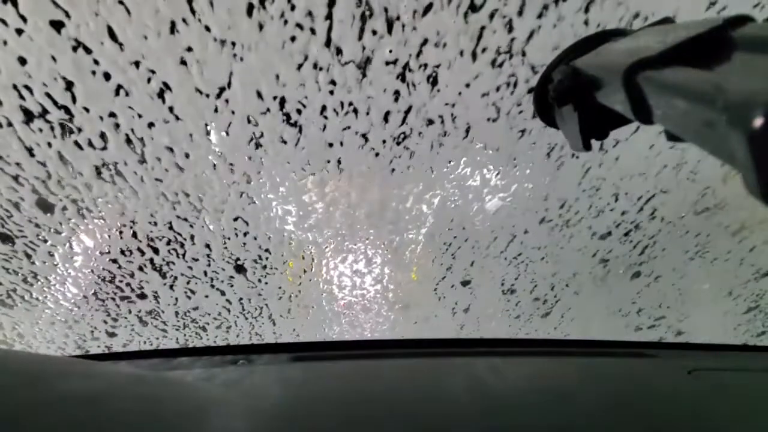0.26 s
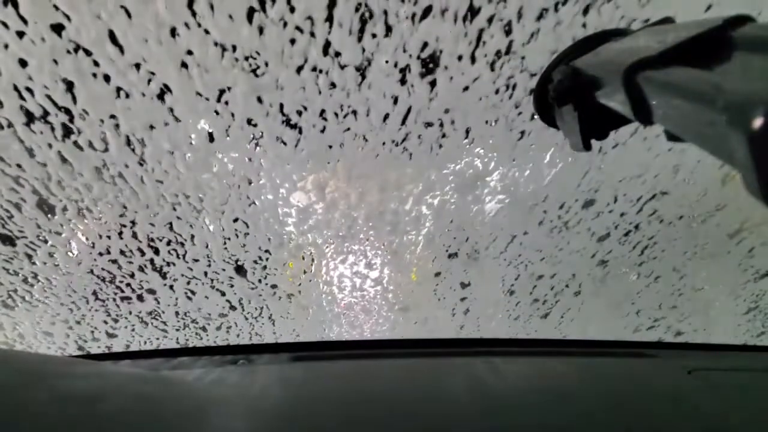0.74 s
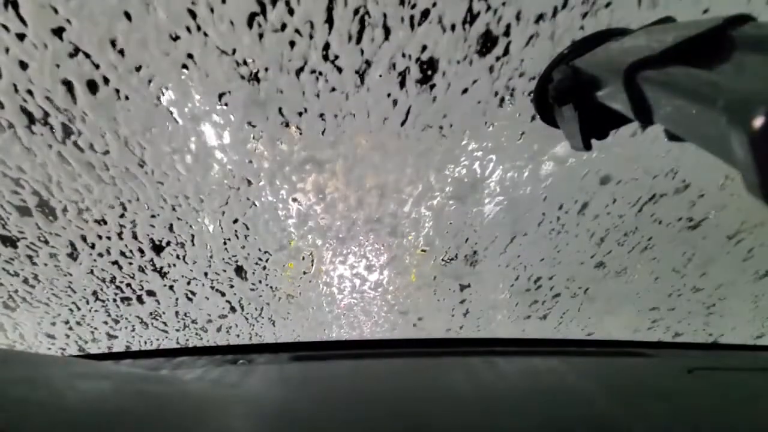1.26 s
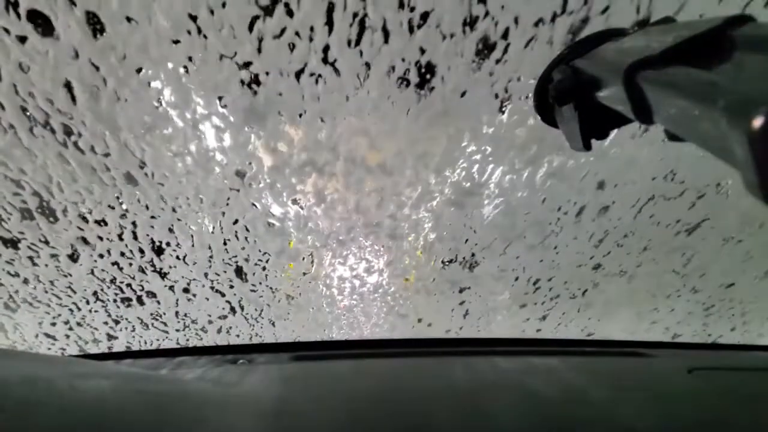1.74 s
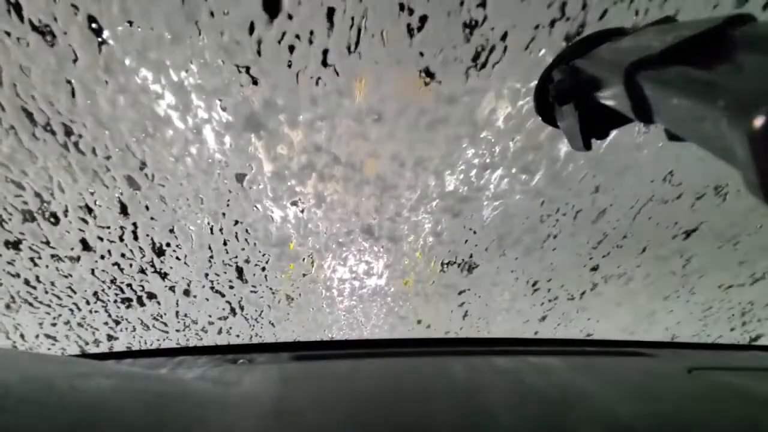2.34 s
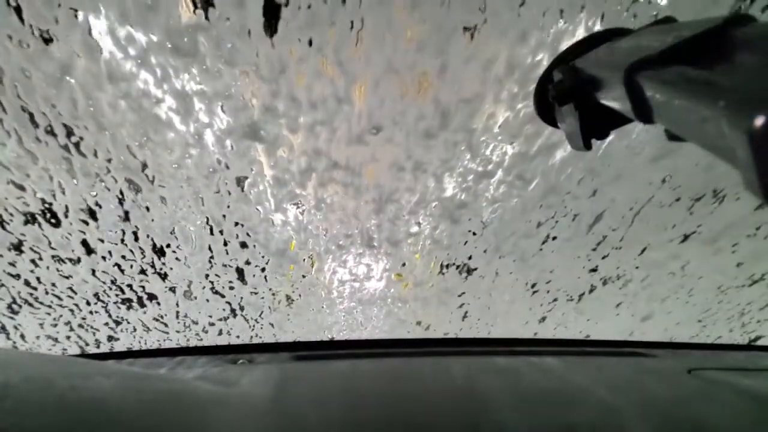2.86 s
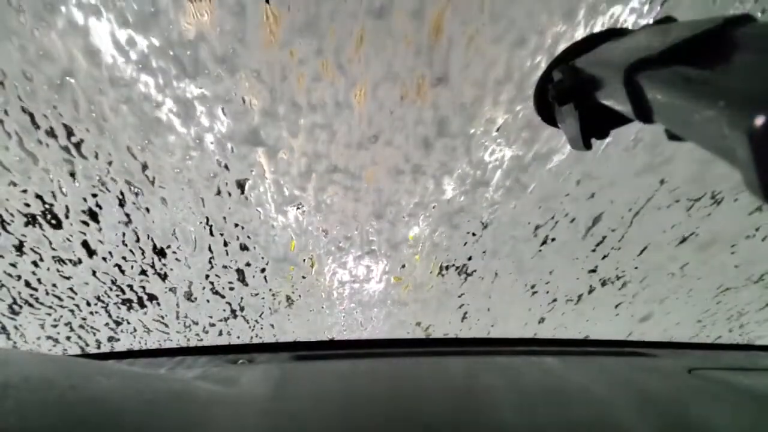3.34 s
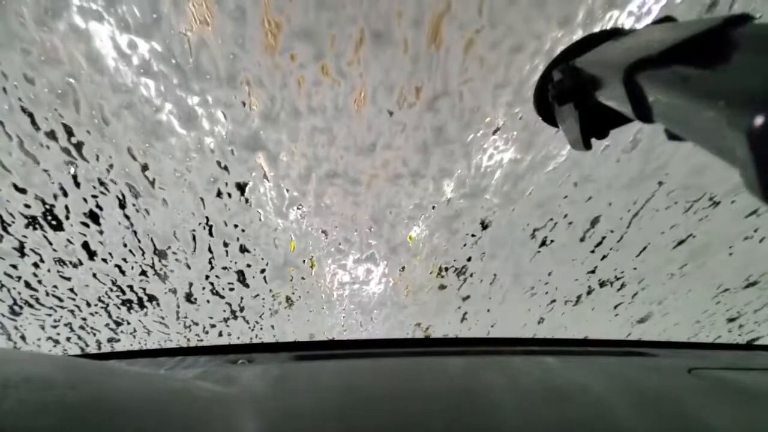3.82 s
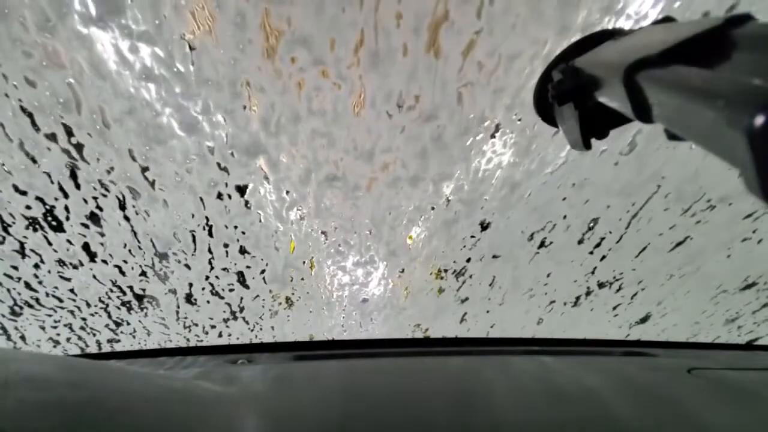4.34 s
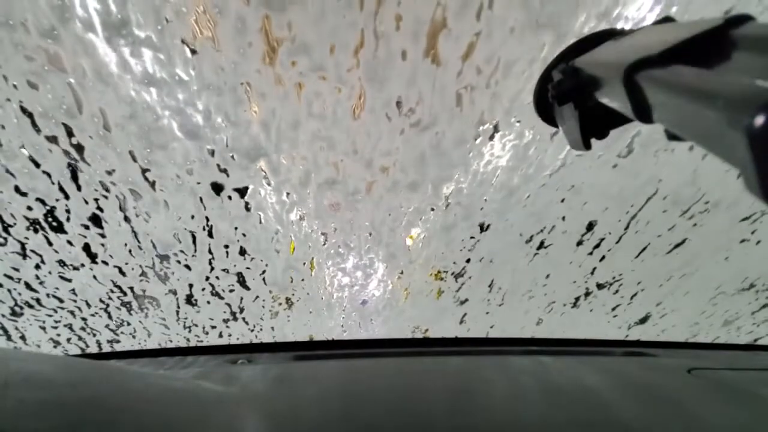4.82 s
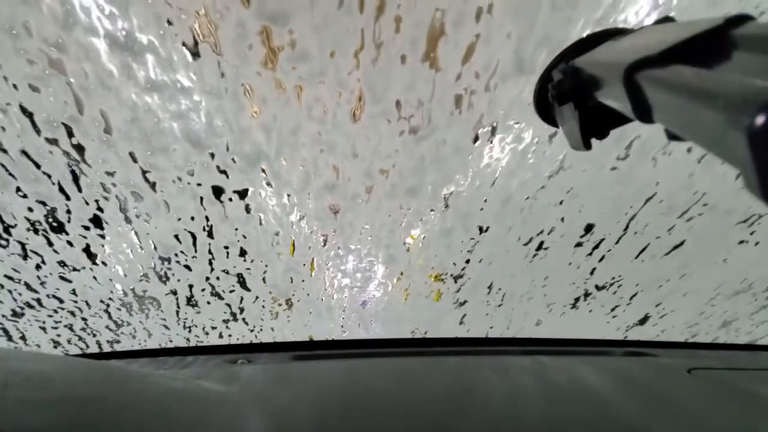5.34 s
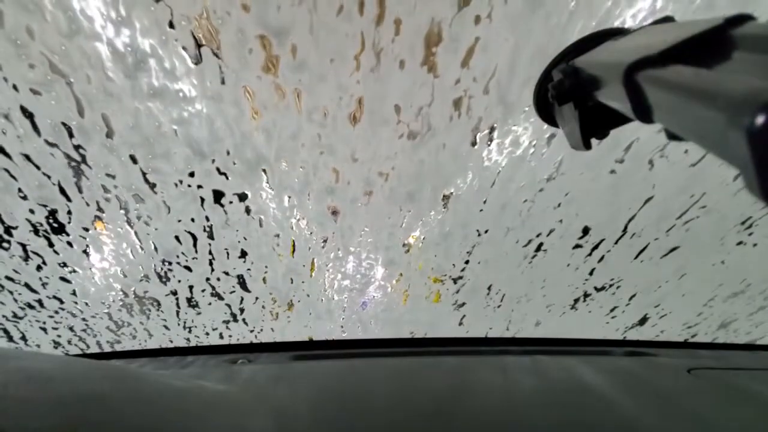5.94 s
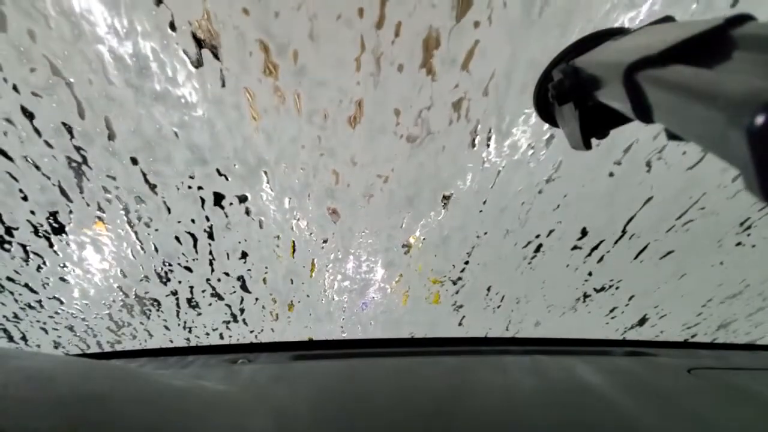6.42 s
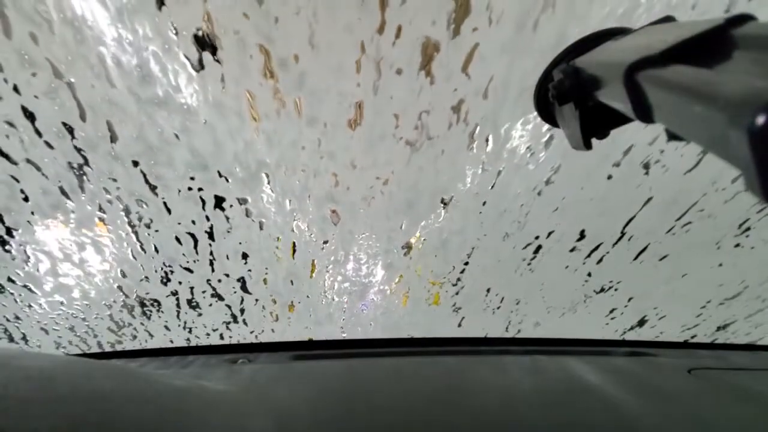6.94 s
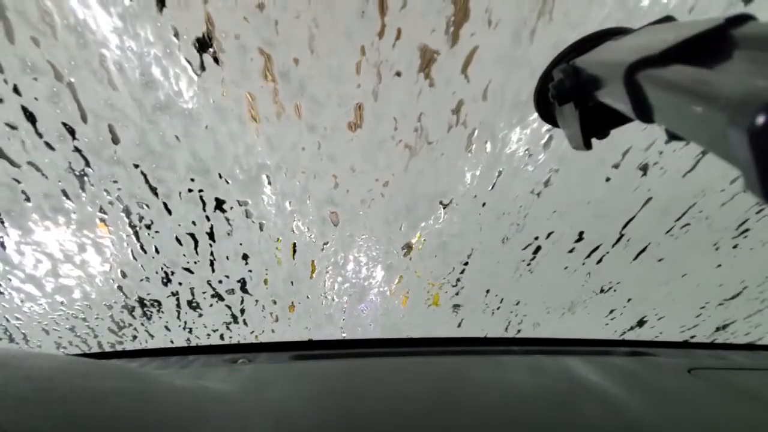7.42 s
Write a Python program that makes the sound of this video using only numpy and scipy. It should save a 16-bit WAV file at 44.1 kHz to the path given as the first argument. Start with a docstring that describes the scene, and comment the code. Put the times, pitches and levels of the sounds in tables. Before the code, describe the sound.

Steady wash noise fills a small boxy car cabin, heard in stereo from within. Low boom and uneven pounding of water on metal mix with hollow panel tones and faint hiss at the seals. Sharp, close, plastic-like crinkling clusters early, then fades. The pounding builds overhead, cuts off suddenly late on, and a low machine rumble rises with a few last small crackles.

```python
"""Water jets and cloth strips drum on the roof, doors and glass of a car in a tunnel wash, heard from inside.
Noise shaped by resonances is the drumming and cabin boom; decaying sines are brief swells of the drumming.
Spray hisses through the seals as broad noise, over a rumble of machinery that grows louder toward the end.
Close to the two microphones something crinkles in short bursts, mostly in the first three seconds.
The jets leave the roof abruptly at six seconds."""
import sys
import numpy as np
from scipy import signal
from scipy.fft import rfft, irfft, next_fast_len
from scipy.io import wavfile
from scipy.ndimage import uniform_filter1d, map_coordinates

SR = 44100
rng = np.random.default_rng(int(sys.argv[2]) if len(sys.argv) > 2 else 0)


def dump_mix(stems):
    """Bounce the given channels to the path in sys.argv[1] as a 16-bit WAV at rate SR."""
    frames = np.atleast_2d(stems).T  # one column per channel
    limited = np.clip(frames, -1, 1)  # hard clip at full scale
    pcm = np.round(limited * 32767).astype(np.int16)
    wavfile.write(sys.argv[1], SR, pcm)


N = 338247

# Force of the strips on the flanks. Each row: time in seconds, level on roof edges in dB, on wings in dB.
FLANK_LEVELS = [(0.0, -32, -27.5), (0.04, -33, -28.5), (0.15, -35.5, -29.5), (2.69, -27, -29),
                (2.84, -33.5, -31), (3.65, -29, -27.5), (3.76, -28, -31.5), (5.17, -23, -29),
                (5.3, -24, -37.5), (5.62, -24.5, -26), (5.66, -23.5, -32), (5.7, -30, -28),
                (6.0, -31.5, -27.5), (6.04, -34, -40), (6.77, -28, -34), (6.81, -33.5, -40.5),
                (7.58, -27, -33), (7.67, -34, -40)]
CREST_DB = 6  # allowance for the peak of a noise burst over its rms
CRINKLE_T = np.arange(SR // 6) / SR  # seconds
CRINKLE_RISE = 1 - np.exp(-CRINKLE_T / 0.003)


def amp(db):
    """Decibel law: twenty dB is a factor of ten in amplitude."""
    return 10 ** (np.asarray(db) / 20)


def unit(x):
    """Normalisation of the root mean square to 1."""
    return x / np.sqrt(np.mean(x ** 2) + 1e-20)


def along(points, hz):
    """Interpolation of (Hz, value) points on a logarithmic frequency axis."""
    f, v = np.transpose(points)
    return np.interp(np.log(hz + 1), np.log(f + 1), v)


def spectrum(points):
    """Spectral envelope: gain as a function of frequency from (Hz, dB) points."""
    return lambda hz: amp(along(points, hz))


def curves(rows):
    """Linear interpolation in time: one curve for each column after the seconds."""
    s, *columns = np.transpose(rows)
    return [np.interp(np.arange(N) / SR, s, column) for column in columns]


def wobble(rate):
    """Slow random modulation: a smooth curve through Gaussian knots, rate of them a second."""
    knots = rng.standard_normal(int(N * rate / SR) + 4)
    return map_coordinates(knots, [np.arange(N) * rate / SR])


def filtered(x, response):
    """Linear filtering: the spectrum times a response of frequency."""
    m = next_fast_len(N + SR // 2)  # padded against wrap-around
    return irfft(rfft(x, m) * response(np.fft.rfftfreq(m, 1 / SR)), m)[..., :N]


def modes(table, steep):
    """Incoherent resonance: powers of (Hz, width, dB) modes add; steep sharpens skirts and narrows width."""
    def gain(f):
        power = 0
        for centre, width, db in table:
            damping = (f * width) ** 2
            bell = damping / ((centre * centre - f * f) ** 2 + damping)
            power = power + amp(2 * db) * bell ** steep
        return np.sqrt(power)
    return gain


def rush(gain, patchy_db, size=3):
    """Filtered stereo noise of rms 1, its level patchy in time and frequency (size x 43 Hz wide)."""
    # Width of the image. Each row: frequency in Hz, side over mid in dB.
    side_over_mid = [(40, -16.5), (62, -26.5), (95, -7), (126, -26.5), (170, -12.5), (320, -11.5),
                     (430, -3), (540, -5), (850, 1), (1150, -0.5), (1400, 2), (1800, -1), (5600, 1.1),
                     (7500, -9.5), (10500, -9.5), (14500, -4.5)]
    z = signal.stft(rng.standard_normal((2, N)), nperseg=1024)[2]
    field = uniform_filter1d(rng.standard_normal(z.shape[1:]), size=size, axis=0)
    field = uniform_filter1d(field, size=30 // size + 1, axis=1)
    pair = signal.istft(z * amp(patchy_db * unit(field)), nperseg=1024)[1][:, :N]

    def mid_side_gain(hz):
        turn = np.arctan(amp(along(side_over_mid, hz)))
        return gain(hz) * [np.cos(turn), np.sin(turn)]
    mid, side = filtered(pair, mid_side_gain)
    return unit(np.array([mid + side, mid - side]))


def work():
    """Forced vibration: curves of how hard the water works on each part of the car."""
    # Each row: time in seconds, then dB of roof, doors, windscreen, jets outside and side windows.
    force_levels = [(0, -32, -25, -29, -30, -27.5), (.2, -31.5, -27, -33, -38.5, -30),
                    (.35, -31.5, -27.5, -34, -35.5, -32), (.52, -26.5, -27.5, -37, -42.5, -39),
                    (.64, -45, -23.5, -34, -35.5, -34.5), (.8, -31.5, -27.5, -34.5, -41, -36.5),
                    (1.6, -29.5, -24, -32, -39, -36), (2.05, -28.5, -22.5, -30.5, -39.5, -36.5),
                    (2.2, -27.5, -28.5, -32.5, -38.5, -36.5), (3.25, -23, -24, -34, -41, -38),
                    (3.5, -20, -28.5, -29, -37.5, -34.5), (3.72, -22.5, -24, -27, -36, -35.5),
                    (3.9, -22, -25, -29.5, -42.5, -38.5), (4.6, -20.5, -22, -33.5, -39.5, -38.5),
                    (5.25, -17.5, -25.5, -31.5, -39, -37.5), (5.55, -24, -20, -33, -40, -39.5),
                    (5.9, -18.5, -26, -30.5, -39.5, -38), (6.07, -41, -37, -39, -41, -40.5),
                    (6.6, -35.5, -31, -36.5, -38, -42.5), (7.15, -41.5, -31, -40, -39.5, -39),
                    (7.45, -32, -34.5, -34.5, -36, -42), (7.67, -29, -33, -33.5, -35.5, -35)]
    return np.array(curves(force_levels))


def flutter(share=1):
    """Random loading: strips land unevenly, each part in its own rhythm and by its share of 1.5 dB."""
    return share * 1.5 * wobble(9)


def cabin_air():
    """Cavity resonance: water on the roof pumps the lowest modes of the cabin air."""
    # Each row: frequency in Hz, width in Hz before sharpening, relative level in dB.
    low_modes = [(40, 8.8, 0)]
    high_modes = [(52.5, 11, 6.5), (82, 35, -2.5)]
    # Each row: time in seconds, lower boom in dB, upper boom in dB.
    boom_levels = [(0.0, -39, -36), (0.13, -29, -38.5), (0.49, -47, -35.5), (0.66, -33, -38.5),
                   (1.77, -27.5, -31), (2.48, -34, -35), (2.54, -26, -34), (2.69, -40, -37.5),
                   (2.76, -28, -53), (2.8, -25, -28.5), (2.93, -43, -35), (3.1, -25.5, -38),
                   (3.99, -38, -36), (6.45, -43, -35.5), (6.73, -37.5, -37), (6.84, -49, -34),
                   (7.13, -33, -49), (7.22, -33, -32), (7.58, -32, -29.5), (7.67, -52, -30)]
    low_db, high_db = curves(boom_levels)
    boom = amp(low_db + flutter()) * rush(modes(low_modes, steep=1.28), patchy_db=4.5)
    return boom + amp(high_db + flutter()) * rush(modes(high_modes, steep=1.186), patchy_db=0.7)


def roof():
    """Plate resonance: water rings the lowest modes of the roof and its edges."""
    # Each row: frequency in Hz, width in Hz before sharpening, relative level in dB.
    centre_modes = [(109.5, 16, -10.5), (124.2, 17, -1.5), (143, 22, -4.5), (165, 24, -9.5)]
    edge_modes = [(182.7, 29, -1.5), (213.6, 106, -1.5), (272, 85, -3.5)]
    centre_db = work()[0] + flutter(0.5) + 0.44 * wobble(22)
    edge_db = curves(FLANK_LEVELS)[0] + flutter(0.32)
    centre = amp(centre_db) * rush(modes(centre_modes, steep=1.56), patchy_db=1.0)
    return centre + amp(edge_db) * rush(modes(edge_modes, steep=2.47), patchy_db=0.36)


def doors_and_wings():
    """Panel resonance: doors and wings ring under the strips."""
    # Each row: frequency in Hz, width in Hz before sharpening, relative level in dB.
    door_modes = [(312.3, 99, -5.5), (380, 77, -1), (429, 94, -2)]
    wing_modes = [(499, 54, -3.5), (547.4, 41, -3), (587, 59, -4.5)]
    door_db = work()[1] + flutter(0.14)
    wing_db = curves(FLANK_LEVELS)[1] + flutter(0.4)
    doors = amp(door_db) * rush(modes(door_modes, steep=2.6), patchy_db=2.5)
    return doors + amp(wing_db) * rush(modes(wing_modes, steep=1.7), patchy_db=0.9)


def glass():
    """Pane resonance: windscreen, side windows and quarter windows ring above the roof and doors."""
    # Each row: frequency in Hz, width in Hz before sharpening, relative level in dB.
    windscreen_modes = [(643, 54, -2), (713, 92, -2.5), (790, 110, -5)]
    window_modes = [(1017, 157, 0.13), (1173, 110, -1.6)]
    quarter_modes = [(898, 173, 0)]
    # Mean level in dB, then dB per dB of roof, doors, windscreen, jets and side windows.
    quarter_rule = (-38, 0, 0.25, .5, -0.5, 0.3)
    parts = work()
    swing = parts - parts.mean(axis=1, keepdims=True)
    quarter_db = quarter_rule[0] + np.dot(quarter_rule[1:], swing) + flutter(0.33)
    windscreen = amp(parts[2] + flutter(0.33)) * rush(modes(windscreen_modes, steep=2.04), patchy_db=1.2)
    windows = amp(parts[4] + flutter(0.21)) * rush(modes(window_modes, steep=1.5), patchy_db=2.5)
    return windscreen + windows + amp(quarter_db) * rush(modes(quarter_modes, steep=1.77), patchy_db=3.0)


def jets():
    """Turbulent noise: jets outside and their nozzles hiss in bands above 1 kHz."""
    # Each row: frequency in Hz, width in Hz before sharpening, relative level in dB.
    jet_bands = [(1352, 365, 1)]
    nozzle_bands = [(1650, 190, 2), (1883, 415, -2)]
    # Each row: time in seconds, level in dB.
    nozzle_levels = [(0, -35.5), (.4, -38), (.55, -43), (.64, -39), (.72, -43), (1.1, -44), (2.2, -44.5),
                     (3.1, -44), (3.65, -38.5), (4.1, -42), (5.6, -43), (5.85, -41), (6.2, -41), (6.8, -42),
                     (7.3, -40.5), (7.67, -37.5)]
    nozzle_db = curves(nozzle_levels)[0] + flutter(0.44)
    nozzles = amp(nozzle_db) * rush(modes(nozzle_bands, steep=2.0), patchy_db=3.0)
    return nozzles + amp(work()[3] + flutter(0.15)) * rush(modes(jet_bands, steep=1.97), patchy_db=2.5)


def seal_hiss():
    """Broadband flow noise: spray and finer mist through the seals share one pulsing flow."""
    # Each row: frequency in Hz, relative level in dB per Hz.
    spray_colour = [(1500, -40), (2200, 1), (2700, -5), (3500, -4.5), (4800, -15), (6800, -20.5),
                    (8000, -32.5), (9500, -57.5)]
    mist_colour = [(6500, -10), (8200, -7.5), (10500, -1.5), (13500, 4.5), (15700, -2)]
    # Each row: time in seconds, spray level in dB, mist level in dB.
    hiss_levels = [(0, -45, -63.5), (.3, -43.5, -62.5), (.7, -47.5, -65.5), (2.6, -44.5, -66.5),
                   (3.15, -45.5, -71), (3.6, -46, -66.5), (4.4, -47, -66.5), (5.35, -47.5, -70.5),
                   (5.9, -47, -70), (6.2, -46, -69), (6.8, -44.5, -65), (7.25, -45.5, -69),
                   (7.67, -42.5, -69.5)]
    spray_db, mist_db = curves(hiss_levels)
    surge = wobble(3.0)  # felt most in the mist
    spray = amp(spray_db + 0.33 * surge) * rush(spectrum(spray_colour), patchy_db=2.5, size=10)
    return spray + amp(mist_db + 0.6 * surge) * rush(spectrum(mist_colour), patchy_db=2.5, size=10)


def singing():
    """Narrow-band noise: lightly damped panel modes sing out while a jet stays on them."""
    # Each row: frequency in Hz, width in Hz before sharpening.
    narrow_modes = [(372, 27), (540, 22), (708, 26), (755, 26), (1080, 100)]
    # Each row: time in seconds, then the level in dB of each narrow mode before a 3 dB cut.
    mode_levels = [(0.0, -34, -42, -38, -33.5, -39.5), (0.04, -36, -37, -47, -40, -41),
                   (0.36, -45, -31, -50, -25, -44), (0.94, -26.5, -41, -46, -42, -49),
                   (1.05, -23, -32, -48, -49, -42), (1.11, -30, -25, -41, -40, -31),
                   (1.18, -30, -30, -36, -38, -38), (2.22, -31, -42, -46, -55, -50),
                   (2.29, -29, -20, -44, -37, -39), (2.71, -26.5, -40, -50, -48, -44),
                   (3.25, -26.5, -41, -39, -45, -33), (3.69, -36, -33, -30, -38, -31),
                   (3.84, -25, -48, -48, -43, -32.5), (4.04, -27, -41, -39, -44, -42.5),
                   (4.74, -34.5, -38.5, -44, -48.5, -42), (5.0, -27, -31.5, -36.5, -40, -45),
                   (5.55, -33.5, -40, -44, -45, -41), (5.88, -29, -41, -35, -45, -39),
                   (6.04, -45, -35, -44, -43, -42), (6.22, -53, -40, -48, -52, -50),
                   (7.13, -40, -43, -45, -36, -62), (7.22, -49, -44, -57, -50, -44),
                   (7.37, -38, -51, -33, -33, -50), (7.52, -31, -43, -48, -41, -40),
                   (7.61, -27.5, -51, -38, -36, -43), (7.67, -29, -45, -48, -50, -37)]
    out = 0
    for (hz, width), level_db in zip(narrow_modes, curves(mode_levels)):
        out = out + amp(level_db - 3) * rush(modes([(hz, width, 0)], steep=1.42), patchy_db=1.0)
    return out


def rumble():
    """Broadband noise: a broad rumble of machinery down the tunnel, growing louder toward the end."""
    # Each row: frequency in Hz, relative level in dB per Hz.
    rumble_colour = [(41, -32), (70, -2.5), (91, -9), (140, 1.5), (208, -5), (333, -13), (426, -8),
                     (900, -28.5), (1170, -59.5), (1980, -120)]
    # Each row: time in seconds, level in dB.
    rumble_levels = [(0, -37), (3, -37), (5.9, -32), (6.1, -31.5), (6.6, -31.5), (7.1, -27.5), (7.3, -26),
                     (7.5, -22.5), (7.67, -25.5)]
    return amp(curves(rumble_levels)[0]) * rush(spectrum(rumble_colour), patchy_db=1.4)


def swells():
    """Resonant swell: each brief swell of the drumming rises at one pitch and dies away."""
    # Each row: start in seconds, frequency in Hz, level in dB before rise and decay.
    swell_events = [(.012, 1065, -23), (.05, 1160, -20.5), (0.158, 1050, -23), (0.501, 547, -19.5),
                    (0.981, 382.6, -21), (1.09, 544.3, -15), (1.181, 380, -13), (1.471, 40, -19),
                    (1.849, 533, -13.5), (2.17, 131.3, -8.5), (2.31, 544, -16.5), (2.67, 127, -13),
                    (2.355, 141, -16), (2.976, 133, -15), (3.355, 139.6, -13), (3.131, 380, -8),
                    (3.684, 126.5, -10), (3.57, 709, -22), (3.67, 708, -19), (3.725, 697, -17),
                    (3.946, 148.7, -9), (4.02, 395, -23), (4.038, 127.3, -9), (4.17, 125.3, -5),
                    (4.244, 193, -12.5), (4.42, 125.5, -18), (4.329, 131, -6.5), (4.537, 182.4, -14),
                    (4.632, 139.6, -10.5), (4.748, 151.5, -15), (4.845, 127, -9), (4.951, 136.2, -6.5),
                    (5.187, 177, -6.5), (5.212, 134, -6.5), (5.287, 126.3, -8.5), (5.298, 202, -13.5),
                    (5.41, 132, -10.5), (5.62, 130, -9), (5.641, 196, -14.5), (5.62, 396, -11),
                    (5.797, 131.6, -8), (7.217, 148, -17.5), (7.385, 52.3, -16)]
    rise_s, t60_s, t60_hz, damping = 0.0095, 0.34, 130, 0.32  # t60 holds at t60_hz
    t, out = np.arange(SR // 2) / SR, np.zeros(N + SR)
    for s, hz, db in swell_events:
        decay_db = 60 * t / t60_s * (hz / t60_hz) ** damping  # higher pitches die sooner
        ring = np.sin(2 * np.pi * (hz * t + rng.random())) * amp(db - decay_db)
        out[round(s * SR):][:len(t)] += ring * (1 - np.exp(-t / rise_s))
    return out[:N]


def sheet_ring():
    """Modal superposition: damped sines of the crinkling sheet, in another phase at each ear."""
    # Each row: frequency in Hz, mean level in dB, 60 dB decay time in seconds.
    sheet_modes = [(1850, -8, .018), (2350, -7.5, 0.012), (2900, -2.5, 0.023), (3412, -1, .022),
                   (3800, -2, 0.019), (4700, -5.5, 0.013)]
    ring = 0
    for hz, db, t60 in sheet_modes:
        phase = rng.random((2, 1))
        decay = amp(db + rng.normal(0, 3.2) - 60 * CRINKLE_T / t60)
        ring = ring + decay * np.sin(2 * np.pi * (hz * CRINKLE_T + phase))
    return ring * CRINKLE_RISE


def snaps():
    """Impulsive excitation: envelopes of body, sheen and top, the rings, and the bustle after each snap."""
    # Each row: start in seconds, nominal peak in dB, sheen over body in dB,
    # top in dB relative to the nominal peak, ring frequency in Hz.
    snap_events = [(0.188, -29, -18, -39, 2370), (0.223, -32, -20, -41, 2670),
                   (0.6838, -38.5, -14, -21, 2750), (0.703, -31.5, -1, -16, 3640),
                   (0.7317, -36, -18, -34, 3480), (0.8964, -12.5, -8.5, -18, 4380),
                   (0.93, -37, -8, -24, 3300), (0.996, -31, -15, -30, 3630),
                   (1.0555, -27.5, -12, -27, 3560), (1.084, -28.5, -6, -17, 3000),
                   (1.106, -35, -11, -22, 3000), (1.142, -31, -6, -21, 2250), (1.156, -32, -13, -23, 2900),
                   (1.222, -11, -13, -29.5, 3270), (1.236, -27.5, -12, -28, 3020),
                   (1.2444, -28.5, -2, -20.5, 3100), (1.261, -27, -10, -37, 3080),
                   (1.2974, -27.5, -18, -27, 3500), (1.448, -36, -6, -23.5, 3500),
                   (1.363, -23.5, -20, -31.5, 3540), (1.3885, -27, -8, -30, 3020),
                   (1.476, -21, -13, -34.5, 3470), (1.494, -38, -13, -28, 2600),
                   (1.589, -36.5, -15, -21, 3000), (1.5449, -41, -2, -20.5, 2340),
                   (1.633, -24, -9, -22.5, 2750), (1.6466, -25.5, -2.5, -16, 3220),
                   (1.656, -16.5, -11.5, -20, 3470), (1.668, -37, -7, -19, 2360),
                   (1.729, -24.5, -8, -26.5, 3750), (1.7466, -15.5, -13.5, -25.5, 3320),
                   (1.765, -29, -7, -25.5, 3300), (1.799, -35, -18, -28, 3000),
                   (1.835, -26.5, -19, -34.5, 3200), (1.778, -29.5, -8, -21, 3630),
                   (1.845, -25, -20, -35, 3760), (1.863, -44, -20, -30, 3300), (1.917, -26, -16, -31, 3350),
                   (1.946, -40.5, -18, -21.5, 3000), (1.9085, -17, -14, -32.5, 3330),
                   (1.927, -17.5, -11, -30.5, 3550), (2.005, -31.5, -4, -17.5, 2940),
                   (2.024, -29, -13, -32, 3020), (2.041, -31.5, -10, -30, 2070),
                   (2.0657, -24.5, -2, -15, 3710), (2.086, -22.5, -4, -21, 3800),
                   (2.123, -45.5, -20, -24.5, 3020), (2.158, -42, -11, -27.5, 2510),
                   (2.1809, -37, 2, -22.5, 2520), (2.202, -21, -13, -28, 3060),
                   (2.213, -30.5, -7, -24, 3180), (2.244, -29.5, -2, -27, 2710),
                   (2.305, -22, -9, -26, 3700), (2.326, -20, -20, -34, 3120),
                   (2.36, -28, -14.5, -21.5, 3000), (2.378, -21, -8, -29.5, 2680),
                   (2.398, -27, -13, -26, 3070), (2.4483, -32, -26, -32, 3370),
                   (2.591, -28, -7, -32.5, 2440), (2.6414, -28, 0, -22, 3040),
                   (2.7084, -28, -13, -31.5, 2210), (2.8906, -20.5, -9, -29, 3180),
                   (2.9452, -25, -3.5, -20, 2500), (3.0932, -30.5, -20, -36.5, 3650),
                   (5.843, -29.5, -6.5, -29.5, 2440), (7.0495, -28.5, -16, -29, 2900),
                   (7.4544, -31, -18, -34, 2860), (7.313, -31, -14, -34, 3180),
                   (7.468, -40, -16, -29.5, 3500), (7.4997, -39, -12, -10.5, 2260),
                   (7.606, -22, -22, -41, 3150), (7.635, -35, -15, -32, 3600)]
    usual_db = -27
    half = np.array([[0.5], [-0.5]])  # half the left-over-right level for each ear
    t = CRINKLE_T
    body, bright, top, rings = np.zeros((4, 2, N + SR))
    busy = np.zeros(N + SR)
    for s, db, sheen_db, top_db, hz in snap_events:
        tail_db = -7 - 0.5 * (db - usual_db)  # the loudest have the least tail
        # a short snap over a longer tail in the cabin
        shape = CRINKLE_RISE * (amp(-60 * t / 0.028) + amp(tail_db - 60 * t / 0.11))
        burst = shape * amp(db - CREST_DB + half * (2 + rng.standard_normal()))
        span = slice(round(s * SR), round(s * SR) + len(t))
        body[:, span] += burst
        busy[span] += amp(min(db, usual_db) - 25 - 60 * t / 0.12)
        # sheen and top lean further left and decay faster than the body
        bright[:, span] += burst * amp(sheen_db + half * 2 - 60 * t / 0.21)
        top[:, span] += burst * amp(top_db + CREST_DB + half * 8 - 60 * t / 0.1)
        # one pitch, reaching each ear in another phase
        tone = np.sin(2 * np.pi * (hz * t + rng.random((2, 1))))
        rings[:, span] += burst * amp(4 - 60 * t / 0.03) * tone
        rings[:, span] += sheet_ring() * amp(db - CREST_DB + 1)
    return body[:, :N], bright[:, :N], top[:, :N], rings[:, :N], busy[:N]


def small_creases(busy):
    """Shot noise: creases open at random in clumps, a few large among many small, and cluster after snaps."""
    # Faint rustle between crinkles. Each row: time in seconds, level in dB before the random sizes.
    rustle_levels = [(0, -74), (.6, -54.5), (1.1, -53), (1.7, -52.5), (2.4, -49.5), (2.6, -60),
                     (3.1, -62.5), (7.2, -68), (7.45, -53.5), (7.67, -56)]
    opens = rng.random(N) < 320 * amp(5 * wobble(25)) / SR  # typically 320 a second
    sizes = amp(4 * np.minimum(rng.exponential(size=N), 2))
    creases = opens * sizes * (amp(curves(rustle_levels)[0]) + busy)
    envelope = amp(-60 * CRINKLE_T / 0.029) * (1 - np.exp(-CRINKLE_T / 0.0028))
    patter = signal.fftconvolve(creases, envelope)[:N]
    rings = np.zeros((2, N))
    for part in range(4):  # each quarter of them rings another mix of sheet modes
        some = creases * amp(2) * (np.arange(N) % 4 == part)
        rings += signal.fftconvolve(some[None], sheet_ring(), axes=1)[:, :N]
    return patter, rings


def crinkles():
    """Amplitude-modulated noise: ragged bursts with brief rings; sheen and top vary by crinkle."""
    # Each row: frequency in Hz, relative level in dB per Hz.
    snap_colour = [(1000, -22), (1700, 1), (2300, -1), (2700, -3), (3450, -2.5), (4300, -7.5), (5300, -27),
                   (6500, -48.5)]
    sheen_colour = [(3500, -23), (5000, 0), (6600, -4.5), (8300, -12), (11000, -11.5), (13200, -10),
                    (15700, -17)]
    body, bright, top, snap_rings, busy = snaps()
    patter, crease_rings = small_creases(busy)

    def upper(hz):
        return 1 / (1 + (9500 / (hz + 1)) ** 8)  # crossover from sheen to top at 9500 Hz
    sheen_gain = spectrum(sheen_colour)
    snap = rush(spectrum(snap_colour), patchy_db=1.5)
    sheen = rush(lambda hz: sheen_gain(hz) * (1 - upper(hz)), patchy_db=1.5)
    air = rush(lambda hz: sheen_gain(hz) * upper(hz), patchy_db=1.5)
    # each burst is a run of tiny creases
    ragged = [amp(-0.5 * wobble(250)) for _ in range(3)]
    noise = (body + patter) * snap * ragged[0]
    noise += (bright + amp(-20) * patter) * sheen * ragged[1]  # small creases are duller
    noise += (top + amp(-24) * patter) * air * ragged[2]
    return noise + snap_rings + crease_rings


def scene():
    """Superposition: the sum of everything heard in the cabin."""
    car = cabin_air() + roof() + doors_and_wings() + glass()
    return car + jets() + seal_hiss() + singing() + rumble() + swells() + crinkles()


def record(dry):
    """Band limitation: two microphones of slightly different colour, without deep bass or highest treble."""
    # Each row: frequency in Hz, left over right in dB.
    left_over_right = [(300, 0.1), (700, -0.5), (1500, -1), (3000, -0.5), (6000, 1), (10000, -1),
                       (14000, 1.5)]
    bass_hz, top_hz = 31.2, 15750

    def response(hz):
        lean_db = along(left_over_right, hz) / 2
        bass = 1 / np.sqrt(1 + (bass_hz / (hz + 1)) ** 8)
        return amp([lean_db, -lean_db]) * bass * (hz < top_hz)
    return filtered(dry, response)


dry = scene()
out = record(dry)
dump_mix(out)
```